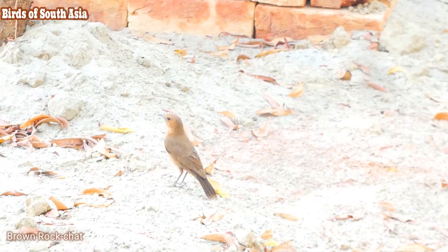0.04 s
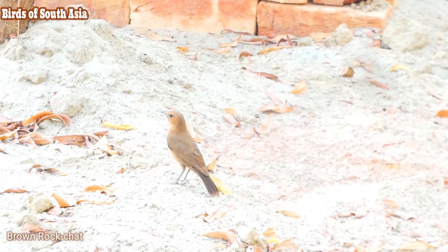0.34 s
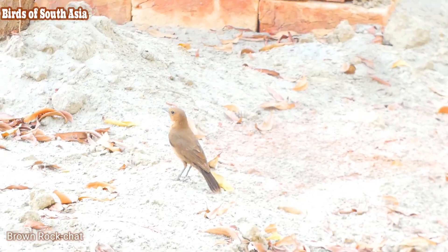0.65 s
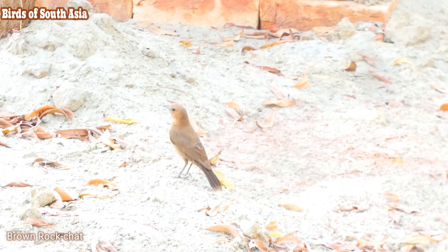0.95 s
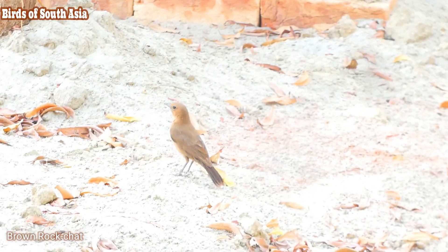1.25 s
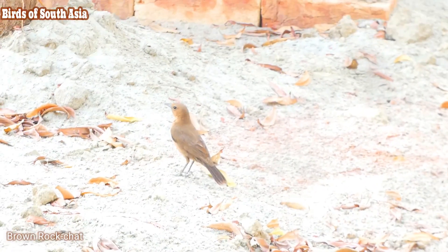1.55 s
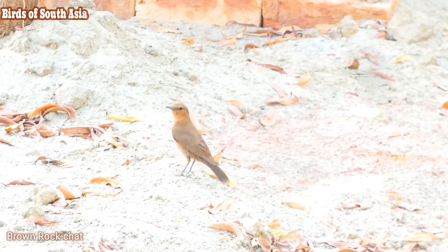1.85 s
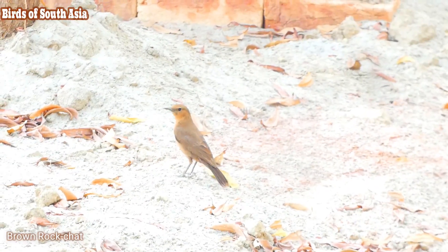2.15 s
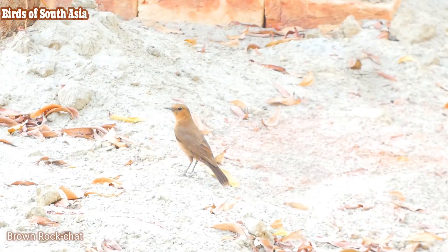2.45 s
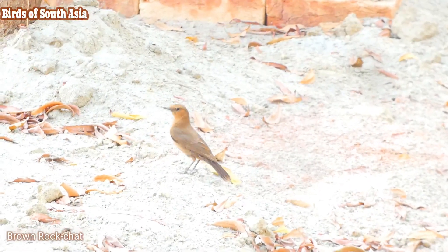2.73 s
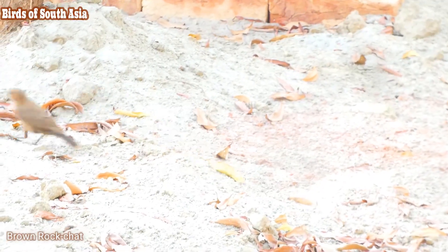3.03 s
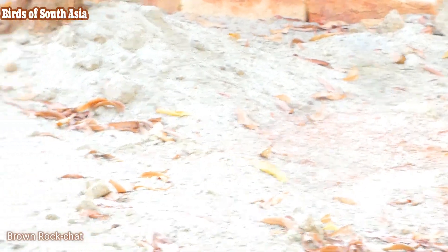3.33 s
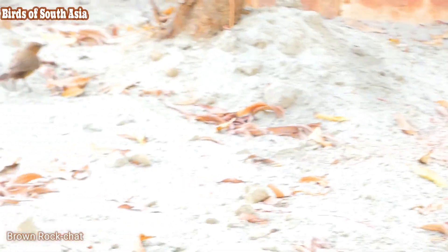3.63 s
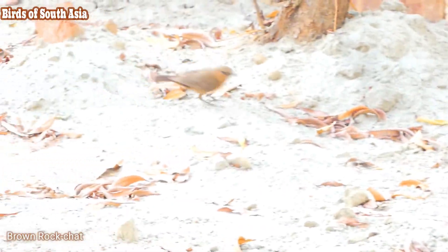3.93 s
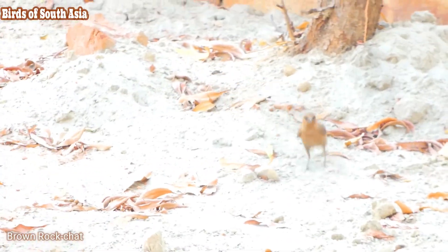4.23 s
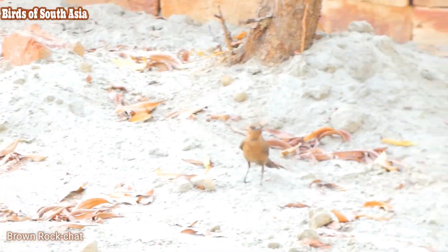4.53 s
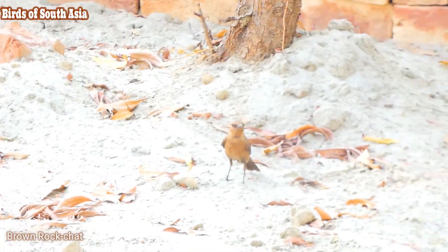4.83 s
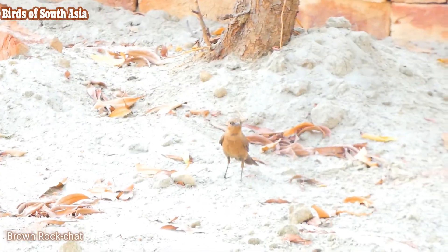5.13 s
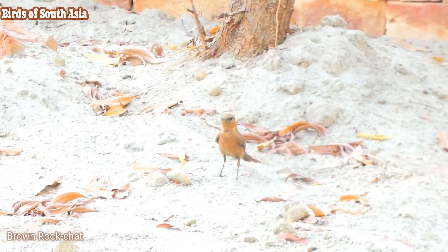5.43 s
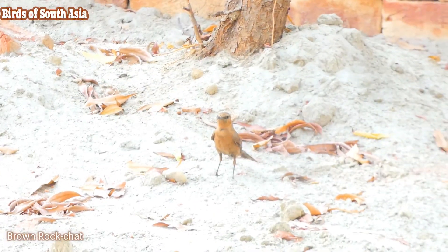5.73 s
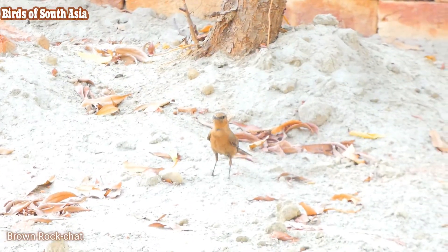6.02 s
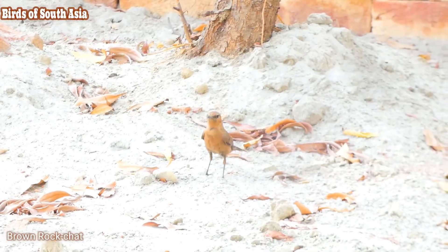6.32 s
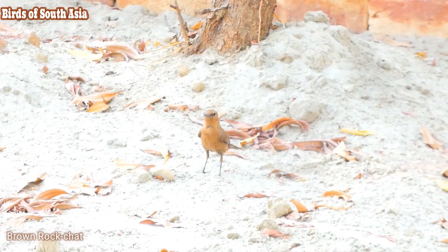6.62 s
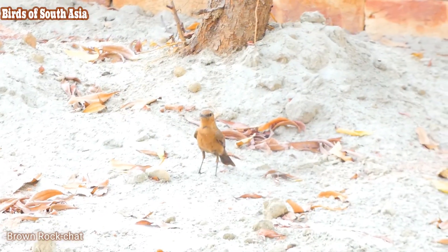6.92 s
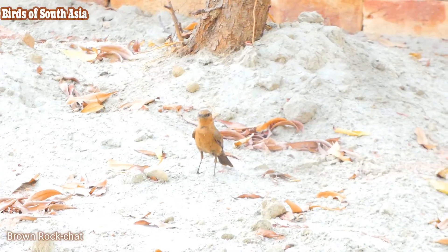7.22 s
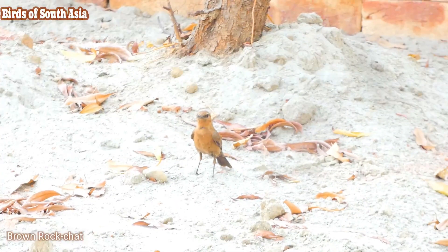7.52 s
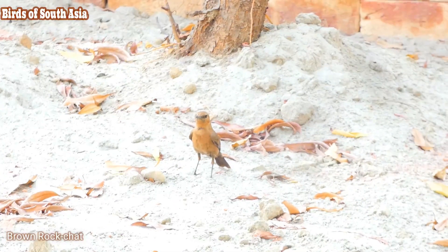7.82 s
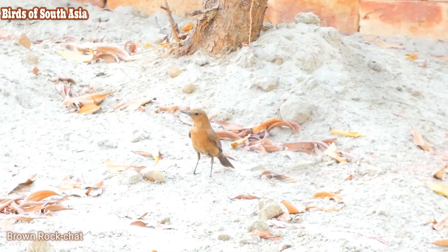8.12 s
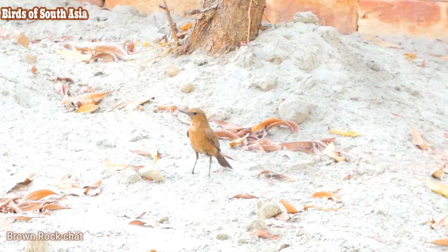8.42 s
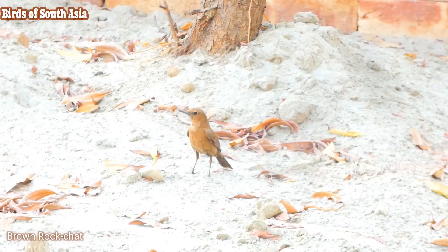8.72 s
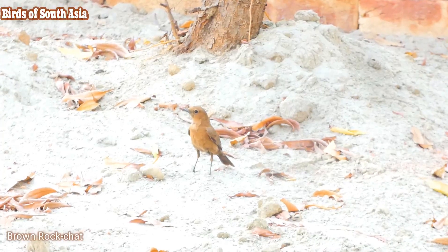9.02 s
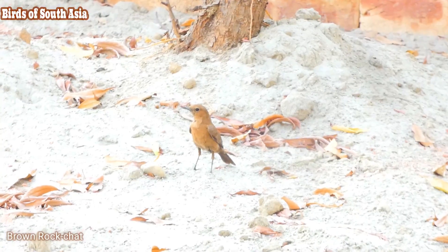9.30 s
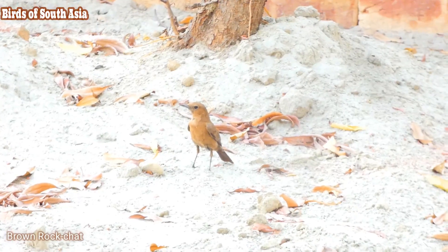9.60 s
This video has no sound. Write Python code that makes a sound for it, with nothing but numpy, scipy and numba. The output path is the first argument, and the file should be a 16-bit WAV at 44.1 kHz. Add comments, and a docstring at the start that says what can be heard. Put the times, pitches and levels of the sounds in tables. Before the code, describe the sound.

A nearby small bird sings two bursts of fast, high phrases, each made of short notes, a trill and a rising whistle. Another bird gives one short harsh squawk during each burst, and a soft run of rasps comes between them. Farther birds whistle, chip, coo and pipe, and are left alone at the end. The yard walls add a slight echo over distant rumble and hiss.

```python
"""Birdsong in a walled yard

A small bird repeats one quick phrase of gliding tones in two bursts: short notes, a trill, a rising
whistle. A second bird squawks twice, one side of its syrinx modulating the other. Others whistle, chip,
hoot and pipe far off, and a soft, even rasping fills the pause. The walls reflect these sounds over a
distant rumble and an airy hiss; an automatic gain control ducks under the song."""
import sys
import numpy as np
from scipy import signal
from scipy.fft import rfft, irfft
from scipy.io import wavfile
from scipy.ndimage import uniform_filter1d
from numba import njit

SR = 44100
rng = np.random.default_rng(int(sys.argv[2]) if len(sys.argv) > 2 else 0)


def wrap_up_sound(samples):
    """Save the sound to the file named by the first command line argument, as 16-bit audio."""
    columns = np.atleast_2d(samples).T
    # keep every value between -1 and 1, then stretch to whole-number steps
    tamed = np.clip(columns, -1, 1)
    steps = np.round(tamed * 32767).astype(np.int16)
    wavfile.write(sys.argv[1], SR, steps)


N = 426006
T = np.arange(N) / SR


def singer(pitch_spread=.0067, level_spread_db=.97):
    """Self-sustained oscillation of the syrinx: one phrase repeats, varying a little in pitch and level."""
    # one phrase: start, peak, end t/s before stretching; start, peak, end f/Hz; level/dB; fullness; part
    notes = [(-.035, -.021, -.012, 4750, 4220, 4000, -11.5, .45, 0),
             (-.017, .002, .007, 4540, 4410, 4300, 2, .35, 0),
             (.011, .0255, .032, 3660, 3900, 4130, 0, .4, 1),
             (.030, .034, .038, 5300, 4900, 4400, -11, .8, 1),
             (.036, .040, .044, 5650, 4920, 4480, -4, .45, 1),
             (.042, .047, .0515, 5700, 4800, 4400, 0, .4, 1),
             (.048, .078, .097, 5680, 5880, 6640, -.5, .8, 2)]
    # phrase onsets: t/s, level/dB
    phrases = [(2.22, -4.5), (2.443, 0), (2.667, .5), (2.8925, 2), (3.121, 1.5), (3.356, 0.5), (3.596, 3),
               (4.982, -1), (5.2142, -0.5), (5.4402, 2.5), (5.6691, 0.5), (5.902, 1.5), (6.1689, 0),
               (6.412, 0.5), (6.655, -1), (6.9, 1), (7.1463, 1.5), (7.414, -1)]
    # bursts of song: start t/s, time stretch, level/dB of parts 0-2 (opening, trill, whistle)
    bursts = [(2.1, 1.039, -7, -4, -7), (4.9, 1, -12, -6, -5)]
    out = np.zeros(N)
    for onset, phrase_db in phrases:
        _, stretch, *part_db = [burst for burst in bursts if burst[0] <= onset][-1]
        for start, peak, end, *hz, db, fullness, part in notes:
            pitches_hz = np.array(hz) * (1 + pitch_spread * rng.standard_normal(3))
            rise, fall = (peak - start) * stretch, (end - peak) * stretch
            note = whistle(rise, fall, pitches_hz, waver=.006, fullness=fullness)
            level_db = phrase_db + db + part_db[int(part)] + level_spread_db * rng.standard_normal()
            add(out, onset + start * stretch, undb(level_db) * note)
    return out


def whistle(rise, fall, pitches_hz, waver, fullness):
    """A pure tone: its amplitude follows breath pressure while its pitch bends through three points."""
    knots = np.cumsum([0, max(rise, .0025), max(fall, .0025)])
    t = np.arange(int(knots[2] * SR)) / SR
    contour_hz = np.polyval(np.polyfit(knots, pitches_hz, 2), t)
    hz = contour_hz * (1 + waver * walk(len(t), 300))
    swell = np.abs(np.sin(np.interp(t, knots, [0, np.pi / 2, np.pi]))) ** (1 / fullness)
    return swell * np.sin(cycle(hz))


def squawker(flutter_ratio=.284, chop_depth=.64, swing_rad=.49):
    """Modulation: one side of the syrinx chops the other, and throat resonance favours the octave."""
    # squawks: t/s, length/s, top f/Hz, level/dB
    squawks = [(2.968, .14, 1342, -12.5), (7.045, .132, 1335, -13)]
    # vocal tract response: f/Hz, level/dB
    throat = [(600, -37.5), (1300, -13.5), (1900, -2.5), (2600, 1.5), (3450, -5.5), (3850, -12.5),
              (5000, -42), (12000, -48)]
    arch_top, arch_width = .3, .46  # shares of the length
    out = np.zeros(N)
    for onset, length, top_hz, db in squawks:
        n = int(length * SR)
        progress = np.arange(n) / n
        arch = np.exp(-((progress - arch_top) / arch_width) ** 2)
        hz = top_hz * (.51 + .49 * arch)
        roughness = 1 - .88 * arch  # greatest at the low ends
        effort = np.sin(np.pi * progress ** .66)
        phase = cycle(hz * (1 + .07 * roughness * walk(n, 900)))
        flutter = cycle(hz * flutter_ratio * (1 + .13 * roughness * walk(n, 540)))
        phase += swing_rad * np.sin(flutter + 1.53)
        voice = undb(-8.5) * np.sin(phase) + np.sin(2 * phase) + np.sin(3 * phase)
        breath = 1.7 * roughness * rng.standard_normal(n)
        # strong and weak beats alternate, adding sidebands at half the spacing
        chop = np.exp(chop_depth * (np.cos(flutter) - 1) + .21 * np.sin(flutter / 2))
        add(out, onset, undb(db) * effort * chop * (voice + breath))
    return colour(out, throat)


def far_birds(faint_db=-57, faint_count=90):
    """Frequency glides: soft whistles, chips and hoots from the trees, over a scatter of fainter chips."""
    # single whistles: t/s, length/s, f/Hz, glide to either side as a share of f, relative level/dB
    slurs = [(.221, 0.2, 4900, -.05, -46), (.353, 0.21, 3170, .06, -42), (0.804, .16, 3100, .05, -44.5),
             (0.982, 0.15, 3000, -.02, -48), (1.159, 0.11, 4470, 0.023, -46.5),
             (1.668, .066, 2620, 0.053, -45), (4.082, 0.064, 2726, .03, -38.5),
             (4.73, 0.048, 2665, 0.041, -41.5), (5.195, 0.083, 2626, .01, -38),
             (8.456, 0.094, 2933, -.03, -41), (9.544, 0.053, 3760, 0.012, -42)]
    # falling double chips, the second lower: t/s, gap/s, first f/Hz, relative level/dB
    chips = [(1.489, .23, 4270, -47), (4.208, .055, 4650, -36), (8.171, .075, 4630, -40)]
    # two-note coos, the second higher and louder: t/s, gap/s, first f/Hz, relative level/dB
    coos = [(6.76, 0.25, 1146, -48.5), (9.28, .21, 1216, -42.5)]
    out = np.zeros(N)
    for onset, length, hz, glide, db in slurs:
        add(out, onset, undb(db) * slur(length, hz, glide, waver=.025))
    for onset, gap, hz, db in chips:
        add(out, onset, undb(db) * slur(.055, hz, glide=-.09, waver=.035))
        add(out, onset + gap, undb(db + 1.5) * slur(.055, hz * .78, glide=-.09, waver=.038))
    for onset, gap, hz, db in coos:
        add(out, onset, undb(db) * slur(.31, hz, glide=.0262, waver=.023))
        add(out, onset + gap, undb(db + 5) * slur(.31, hz * 1.19, glide=.0226, waver=.027))
    hoot = slur(length=.48, hz=679, glide=-.0767, waver=.044)
    add(out, 7.661, undb(-40.5) * hoot)
    for when, pitch, bend, size in rng.random((faint_count, 4)):
        glide = .347 * (bend - .6)
        pitches_hz = 2200 * 2 ** (1.2 * pitch) * (1 + glide * np.array([-1, 0, 1]))
        chip = whistle(.061, .081, pitches_hz, waver=.043, fullness=1)
        add(out, when * N / SR, undb(faint_db) * (.5 + size) * chip)
    return out


def slur(length, hz, glide, waver):
    """A linear sweep: a soft note slides through its pitch, upward for a positive glide."""
    pitches_hz = hz * (1 + glide * np.array([-1, 0, 1]))
    return whistle(length / 2, length / 2, pitches_hz, waver, fullness=2.1)


def piping(start_s=7.78, gap_s=.18, hz=2330, count=12):
    """A periodic train of tone pulses: a far bird pipes one slightly falling note, stressing the start."""
    out = np.zeros(N)
    for k, chance in enumerate(rng.standard_normal(count)):
        note = whistle(.0263, .096, hz * np.array([1.03, 1, .96]), waver=.0059, fullness=1)
        add(out, start_s + k * gap_s, undb(-52 + 5 / (k + 1) + 2 * chance) * note)
    return out


def rasps(start_s=4.192, gap_s=.0745, length_s=.05, swell_s=.28, held_db=-44.5, count=11):
    """Gated grainy noise: an even run of dry rasps swells and holds; lone rustles come from the scrub."""
    # rasp spectrum: f/Hz, level/dB
    spectrum = [(1500, -30), (3000, -5.5), (5200, -0.5), (6500, -8.5), (7500, -14), (10500, -24),
                (15000, -46)]
    # lone rustles: t/s, length/s, level/dB
    rustles = [(0.22, .025, -42.5), (8.167, .18, -52), (8.24, .011, -45)]
    grain = unit(colour(rng.standard_normal(N) * undb(1.4 * walk(N, 810)), spectrum))
    run = [(start_s + age, length_s, held_db - 6 * max(1 - age / swell_s, 0) + 1.3 * chance)
           for age, chance in zip(gap_s * np.arange(count), rng.standard_normal(count))]
    envelope = np.zeros(N)
    for onset, length, db in run + rustles:
        add(envelope, onset, undb(db) * np.sqrt(np.hanning(int(length * SR))))
    return envelope * grain


def yard(x, scatter_db, scatter_t60, tail_db, tail_t60, spread=.15, direct=1):
    """Reverberation: wall echoes, quick ground scatter and a long, patchy tail from the surroundings."""
    # wall reflections: delay t/s, level/dB
    echoes = [(.0022, -18), (.0095, -22.5), (.017, -18.5), (.033, -21.5), (.142, -31), (.243, -33),
              (.425, -43.5)]
    t = np.arange(2 * SR) / SR
    scatter = undb(-60 * t / scatter_t60) * (t > .004)
    tail = undb(-60 * t / tail_t60 + 3 * walk(len(t), 65)) * np.minimum(t / .09, 1)
    diffuse = np.hypot(undb(scatter_db) * scatter / np.linalg.norm(scatter),
                       undb(tail_db) * tail / np.linalg.norm(tail))
    mid, side = diffuse * rng.standard_normal((2, len(t)))
    mid[0] += direct
    for delay, db in echoes:
        mid[int(delay * SR)] += undb(db)
    return np.array([signal.fftconvolve(x, mid + sign * spread * side)[:N] for sign in (1, -1)])


def background(rumble_db=-42):
    """Broadband ambient noise: distant town rumble and airy hiss, partly coherent between the channels."""
    # rumble spectrum: f/Hz, level/dB
    rumble = [(15, -86), (25, -52.5), (48, -41.5), (61, -19.5), (78, -9.5), (165, -0.5), (357, -1.5),
              (630, -10), (943, -17), (1090, -14.5), (2000, -20), (2600, -31.5), (4400, -120)]
    # hiss spectrum: f/Hz, level/dB
    hiss = [(1200, -40), (2000, -0.5), (3300, 2), (4500, -3), (6400, -8.5), (7500, -11), (9700, -18.5),
            (11500, -18.5), (15500, -45)]
    # hiss envelope: t/s, level/dB
    air = [(0, -46), (.6, -50.5), (1.87, -52.5), (2, -47), (4.5, -50.5), (8.2, -50), (8.8, -53),
           (9.66, -52)]
    # stereo width: f/Hz, side level/dB relative to mid
    width = [(30, -15), (100, -24.5), (250, -23), (600, -9), (1500, -10.5), (4000, -18.5), (12000, -5)]
    hiss_gain = undb(np.interp(T, *np.transpose(air)))
    mid, side = (undb(rumble_db) * wandering(rumble)
                 + hiss_gain * unit(colour(rng.standard_normal(N), hiss)) for _ in range(2))
    return mid + colour(side, width) * np.array([[1], [-1]])


def wandering(points):
    """Random amplitude modulation: each half-octave band of a coloured noise swells and sinks a little."""
    half_octaves = 2 * np.log2(np.maximum(np.fft.rfftfreq(N, 1 / SR), 1))
    spectrum = rfft(unit(colour(rng.standard_normal(N), points)))
    bands = (irfft(spectrum * np.maximum(1 - np.abs(half_octaves - k), 0), N) for k in range(8, 24))
    return sum(band * undb(3 * walk(N, 9)) for band in bands)


def undb(db):
    """Amplitude ratio of a level in decibels."""
    return 10 ** (np.asarray(db) / 20)


def add(track, onset, sound):
    """Superposition: a sound joins a track at an onset in seconds."""
    i = max(int(onset * SR), 0)
    track[i:i + len(sound)] += sound[:max(N - i, 0)]


def colour(x, points):
    """Zero-phase filtering by a curve of (f/Hz, level/dB) points."""
    hz, db = np.transpose(points)
    f = np.maximum(np.fft.rfftfreq(len(x), 1 / SR), 1)
    return irfft(rfft(x) * undb(np.interp(np.log(f), np.log(hz), db)), len(x))


def unit(x):
    """Normalisation to rms 1."""
    return x / np.std(x)


def walk(n, rate_hz):
    """Low-pass noise: a smooth random fluctuation with a spread near 1."""
    hold = max(int(SR / rate_hz), 2)
    return uniform_filter1d(np.repeat(rng.standard_normal(n // hold + 1), hold), hold)[:n]


def cycle(hz):
    """Phase as the time integral of frequency."""
    return 2 * np.pi * np.cumsum(hz) / SR


@njit
def follow(x, attack, release):
    """Envelope detection: a one-pole smoother with separate rates up and down."""
    out, level = np.empty(len(x)), 0.
    for i in range(len(x)):
        level += (x[i] - level) * (attack if x[i] > level else release)
        out[i] = level
    return out


def scene():
    """The direct-to-reverberant ratio falls with distance: far birds are heard mostly as scatter."""
    near = yard(singer() + rasps(), scatter_db=-13.5, scatter_t60=.27, tail_db=-23.5, tail_t60=1.25)
    harsh = yard(squawker(), scatter_db=-9.5, scatter_t60=.36, tail_db=-14, tail_t60=1.1)
    far_calls = (far_birds() + piping()) * undb(-2)
    far = yard(far_calls, scatter_db=-3, scatter_t60=.28, tail_db=-7, tail_t60=1.1, spread=.25, direct=.55)
    return near + harsh + far + background()


def record(dry, ceiling_db=-9, release_s=.3, sideband_hz=3905, cutoff_hz=15650):
    """Gain control holds the peaks; slight distortion adds sidebands and overtones; the top is cut."""
    # microphone's uneven treble response: f/Hz, level/dB
    microphone = [(6600, -3), (7500, -7.5), (8400, -5), (9800, 1), (11500, -4.5), (14000, 0.5), (15400, 3)]
    peak = follow(np.abs(dry).max(axis=0), attack=5000 / SR, release=1 / (release_s * SR))
    # the gain glides over several milliseconds, so each note keeps its shape
    held = dry / uniform_filter1d(np.maximum(peak / undb(ceiling_db), 1), size=500)
    phase = 2 * np.pi * sideband_hz * T
    ripple = 1 + undb(-27) * np.sin(phase) + undb(-39) * np.sin(2 * phase)
    overtones = signal.sosfilt(signal.butter(1, 90, "high", fs=SR, output="sos"), held ** 2)
    distorted = held * ripple + undb(-31) * overtones
    lowpass = signal.ellip(8, .2, 70, cutoff_hz, fs=SR, output="sos")
    return signal.sosfilt(lowpass, [colour(channel, microphone) for channel in distorted])


dry = scene()
out = record(dry)
wrap_up_sound(out)
```